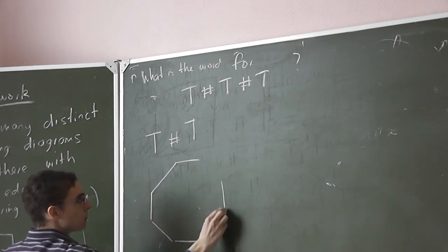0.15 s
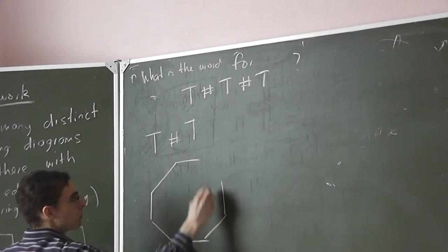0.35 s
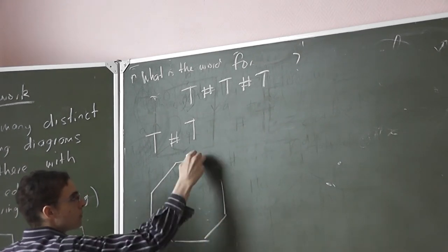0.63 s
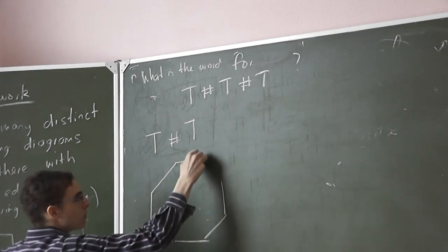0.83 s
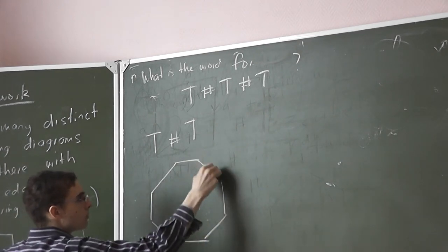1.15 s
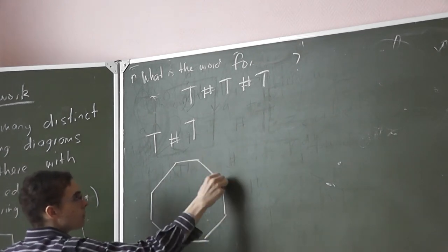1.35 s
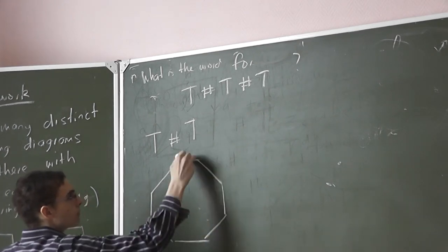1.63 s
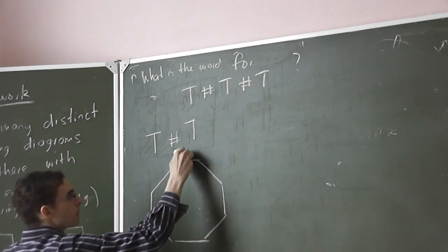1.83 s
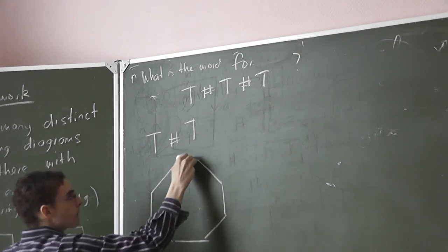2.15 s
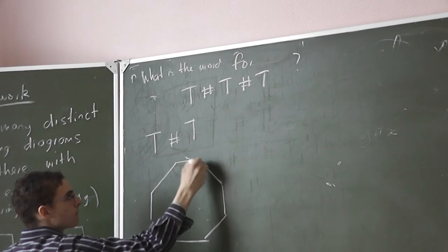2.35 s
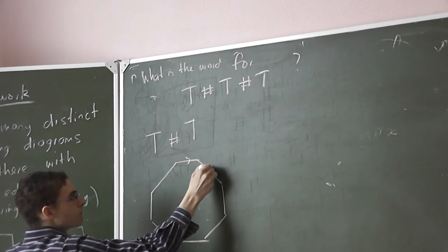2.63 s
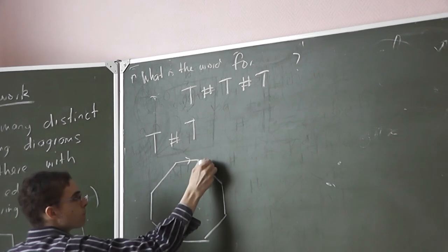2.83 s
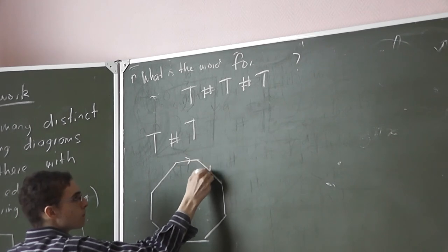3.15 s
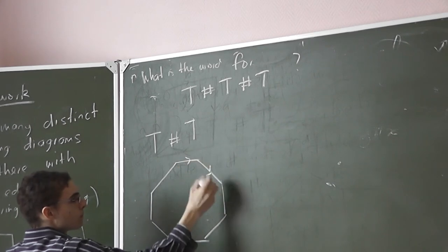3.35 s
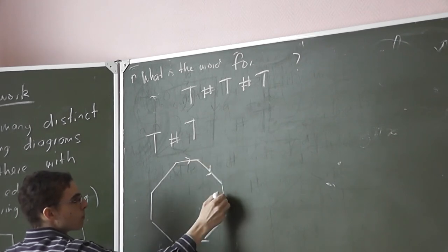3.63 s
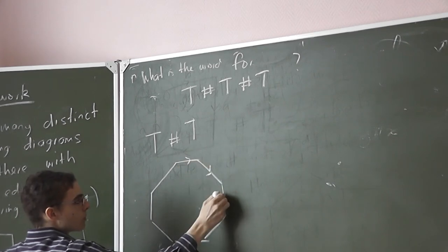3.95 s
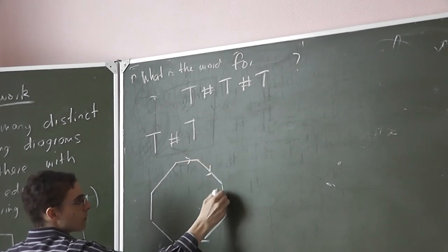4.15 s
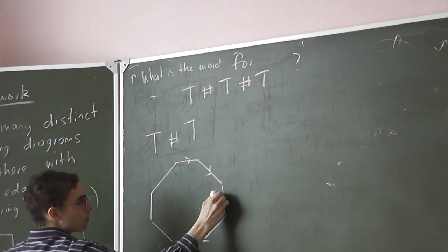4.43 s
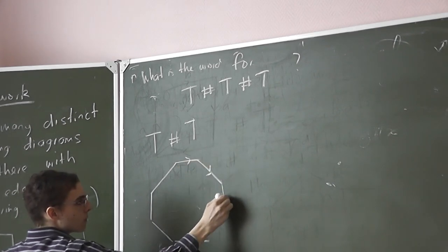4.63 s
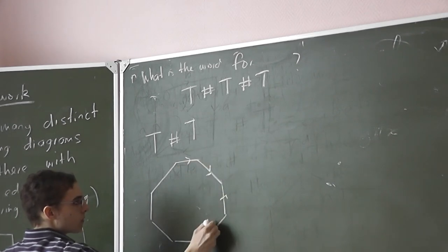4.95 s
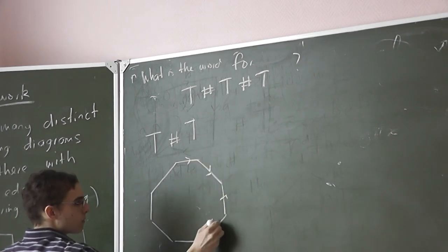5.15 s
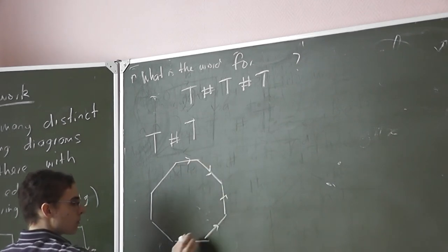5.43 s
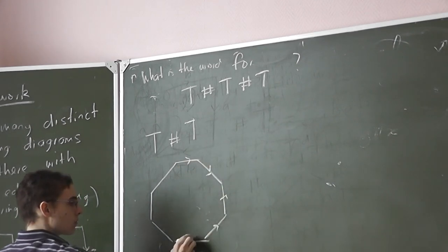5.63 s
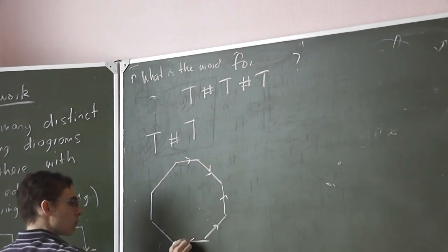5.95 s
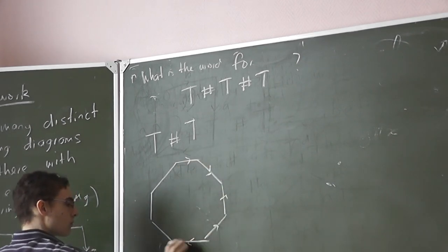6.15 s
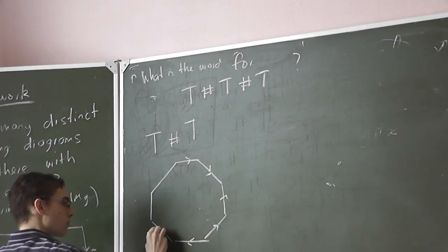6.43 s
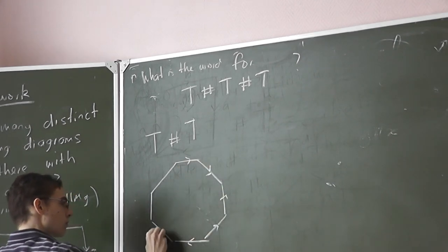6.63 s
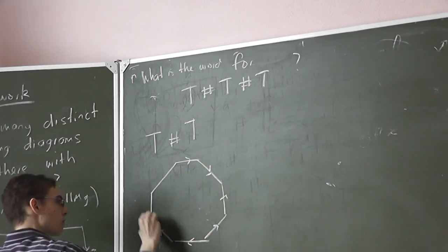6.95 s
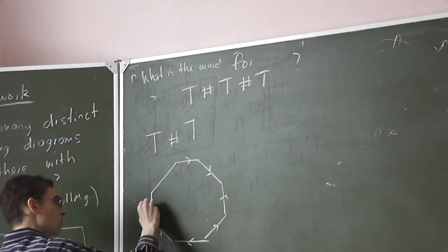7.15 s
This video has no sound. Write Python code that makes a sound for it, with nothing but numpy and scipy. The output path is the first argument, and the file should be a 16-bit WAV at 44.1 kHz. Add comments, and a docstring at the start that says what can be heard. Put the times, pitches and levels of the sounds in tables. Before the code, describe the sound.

A bare, hard-walled classroom with a steady soft hum of air and far machinery; chalk works on a large blackboard a few metres away. The tail of a knock opens it, with a dry scrape of a third of a second from 0.1 and a faint rub at 0.6. A sharp hollow knock at 0.85 leads into a longer, growing scrape to 1.6, with a dull low bump at 1.4. A crisp knock at 1.95 brings two short rubs; another at 2.75 is followed by quick gritty strokes until 3.45. At 3.9 a sleeve swishes softly with a knock. From 4.3 to 4.9, a hard tap and dense scribbling carry thin, faint squeaks, clearest near 4.7. Knocks at 5.15, 5.9 and 6.6 each have brief, quieter rubs after them. Faint scraping ends near 7.05, then a tiny tick at 7.25. Each knock rings woodily for about half a second.

```python
"""Chalk knocks on a large wall blackboard in a bare classroom, then rubs short lines, heard a few metres away.
Each landing is a short push that drums the modes of the board, with a faint tick as the tip chips.
Rubbing breaks off random crumbs of dust, which ring the stick and the board; some strokes squeak.
A sleeve brushes past once, as soft noise that swells and fades. The room rings for about half a second
over a steady hum of air and far machinery, made from shaped noise."""
import sys
import numpy as np
from scipy import signal
from scipy.fft import rfft, irfft, next_fast_len
from scipy.io import wavfile
from scipy.ndimage import uniform_filter1d, map_coordinates

SR = 44100
rng = np.random.default_rng(int(sys.argv[2]) if len(sys.argv) > 2 else 0)


def master(y):
    """Save y as 16-bit WAV."""
    cut = np.clip(np.atleast_2d(y).T, -1, 1)
    pcm = np.round(cut * 32767)  # scale
    wavfile.write(sys.argv[1], SR, pcm.astype(np.int16))


N = 321489  # length in samples

# Landings of the stick: start_s, push_db, contact_ms, drum_db (low boom of the spot that is hit)
LANDINGS = [(-.06, 13, 0.79, 0), (.854, 18.5, .5, -5.5), (1.439, -5, 5.2, 22.5), (1.951, 19, 0.65, -7),
            (2.75, 16, .44, -5), (3.351, -1.5, 0.8, -19), (3.886, -24, .31, 7), (3.905, 13, 0.71, -4),
            (4.278, -26.5, 0.2, -10), (4.365, 16, 0.47, -6.5), (4.59, -8.5, 0.2, -5),
            (5.144, 18, 0.717, -5.5), (5.916, 9.5, 0.67, 2), (6.62, 11.5, 0.67, -2)]
# Rubbed lines: start_s, length_s, hiss_db, swell_db (start to end),
# then, against the hiss: body_db (board), ring_db (stick)
STROKES = [(0.083, 0.33, -49, 1, -4, -3.5), (0.585, 0.088, -64, -11, -7, -12),
           (0.955, 0.61, -53.5, 9.5, 2.5, -3), (2.114, 0.15, -56, -5, 4, 1),
           (2.295, 0.099, -55.5, 7.5, 9, 3.5), (2.937, .12, -57.5, 7, 6.5, 4),
           (3.121, 0.15, -58, -7, 7, 5.5), (3.259, 0.19, -54, -12, 2.5, -1.2),
           (4.063, 0.13, -64.5, -6, -11, 7.5), (4.413, 0.15, -50.5, 5, 8.5, -10),
           (4.579, .13, -49, -19, 3.5, -16), (4.674, 0.061, -55.5, 6, 8, -9),
           (4.745, 0.1, -56.5, -8, 7.5, -1), (5.108, 0.039, -59, -2, 2, -7), (5.182, .18, -59, -6, 5.5, -4),
           (5.37, .11, -57, 7, 6.5, 2.5), (5.964, .15, -58.5, 4, 4.5, 3.5), (6.114, 0.15, -63, 6, 12, 8),
           (6.661, 0.086, -63, -.6, 6, 11), (6.787, 0.12, -60, -6.5, 6.5, 2.5),
           (6.957, 0.098, -65, -7, 11.5, 10)]
# Notes of the tip sticking and slipping: start_s, length_s, pitch_hz, level_db
SQUEAKS = [(4.51, .08, 7750, -69), (4.6, .14, 7750, -70), (4.7, .045, 2930, -54), (4.76, .03, 2930, -64),
           (4.82, .17, 2935, -74)]
# Modes of the board: pitch_hz, width_hz, level_db
BOARD_MODES = [(228.5, 31, 9.5), (291.2, 20.7, 13), (376.4, 19, 6.5), (543, 22, 9), (582, 11, 2.5),
               (703.5, 13.5, 6), (829, 8.8, 9.5), (898.4, 9.2, 3), (1030, 47, 5.5), (1270, 9.8, -18),
               (1357, 9, 3), (1740, 8.8, -26), (1820, 56, -3.5), (2017, 43, 4)]
# Lengthwise modes of the chalk: pitch_hz, width_hz, level_db
STICK_MODES = [(5530, 720, 5), (11920, 540, 6)]
# Tone of the knock on the board: frequency_hz, gain_db
KNOCK_TONE = [(60, -30), (150, -35), (195, -15.5), (225, -7.5), (500, -6.5), (900, 0), (1500, -0.5),
              (2400, -2), (3200, -2.5), (4500, -5), (9000, -24), (16000, -28)]
# Tone of a chipping tip: frequency_hz, gain_db
TICK_TONE = [(1500, -20), (3000, 0.5), (5000, 5), (8000, -9), (16000, -24)]
# Tone of the breaking dust: frequency_hz, gain_db
DUST_TONE = [(1500, -44), (2500, 0.5), (4200, -3), (7000, -7.5), (10500, -16), (13000, -21.5), (14500, -27),
             (15700, -44)]
# Tone of the board's body under a stroke: frequency_hz, gain_db
BODY_TONE = [(120, -72), (300, -7), (500, -7.5), (900, -2.5), (1600, 0), (2400, -7), (3500, -31),
             (6000, -70)]
# Tone of the room's steady noise: frequency_hz, level_db_per_hz
AIR_TONE = [(15, -41), (25, -37), (43, -5.5), (75, -8), (156, -6), (183, -13), (210, -4), (275, -7),
            (423, -11), (898, -14), (1380, -19), (1580, -19.5), (2710, -31), (4280, -29), (15600, -43.5)]
# Narrow swells in the air noise: pitch_hz, width_hz, level_db
HUM_MODES = [(119, 5.1, 6), (163.7, 15.5, 9), (872, 154, 4.5), (4310, 270, -2.5)]
# Left-right likeness of the air noise: frequency_hz, likeness (1 = same on both sides)
AIR_ALIKE = [(60, 0.42), (180, -0.0), (550, 0.082), (1650, 0.74), (4970, 1), (15000, 0.39)]
# Left-right likeness of the room's tail: frequency_hz, likeness (1 = same on both sides)
ROOM_ALIKE = [(60, 0.13), (180, 0.99), (550, 0.56), (1650, 0.16), (4970, 1), (15000, 0.29)]
# Time the room takes to fade by 60 dB: frequency_hz, fade_s
ROOM_FADE = [(150, 0.67), (400, 0.56), (1000, 0.53), (2800, 0.38), (7000, 0.32), (14000, 0.38)]
# Left side over right side: frequency_hz, difference_db
LEAN = [(100, -1.5), (300, -.5), (900, -0.7), (3000, 0), (10000, 0)]
# Tone of the brushing cloth: frequency_hz, level_db_per_hz
CLOTH_TONE = [(1470, -24), (2500, -8), (2950, -14), (3860, -5), (6130, -3.5), (7080, -7), (7800, -8),
              (10800, -25), (13000, -26)]
# Chips of the tip with no landing: start_s, level_db
LONE_CHIPS = [(2.092, -50), (7.257, -39)]

AIR_DB = -53.5
TOP_HZ = 15740  # the highest treble, from here up, is left out
UPPER_DB = -0.5  # the board around 1.7 kHz, under every landing
CHIP_DB, CHIP_DELAY_S = -37, .004  # the tip chips as the stick rocks: against the push, after the landing
# The drum follows the body, and is stronger in a long stroke
DRUM_DB, DRUM_PER_BODY, DRUM_DB_PER_S = -15.5, 0.94, 18.5
TOP_DB, TOP_PER_RING = 0.8, 0.43  # the top octave follows the ring of the stick
# The tip creeps after a landing: length, hiss against the push, then body and ring against the hiss
SETTLE_S, SETTLE_DB, SETTLE_BODY_DB, SETTLE_RING_DB = 0.2, -79, 6.5, -12
# The sleeve brushing past: loudest moment, its level, its end; then the rise and fall slopes
BRUSH_S, BRUSH_TOP_DB, BRUSH_END_S = 3.888, -55.5, 4.1
BRUSH_RISE_DB_PER_S, BRUSH_FALL_DB_PER_S = 84, 57
WALL_S, WALL_DB, WALL_HZ = .016, -4.5, 1500  # the facing wall's dulled echo: delay, level, treble limit


def amp(db):
    """Turn decibels into a plain multiplier."""
    return 10 ** (np.asarray(db) / 20)


def unit(x):
    """Scale a sound to an average (RMS) level of one."""
    return x / np.sqrt(np.mean(x ** 2) + 1e-20)


def along(points, hz):
    """Read a curve of (Hz, value) points on a log frequency axis."""
    f, value = np.transpose(points)
    return np.interp(np.log(hz + 1), np.log(f + 1), value)


def wobble(rate):
    """A smooth random curve through this many random points a second."""
    knots = rng.standard_normal(int(N * rate / SR) + 4)
    return map_coordinates(knots, [np.arange(N) * rate / SR])


def filtered(x, response):
    """Shape a sound by multiplying its spectrum with a response."""
    m = next_fast_len(x.shape[-1] + SR // 4)
    spectrum = rfft(x, m) * response(np.fft.rfftfreq(m, 1 / SR))
    return irfft(spectrum, m)[..., :x.shape[-1]]


def causal(gain):
    """Give a gain curve the phase that makes its sound start no earlier than its cause."""
    cepstrum = irfft(np.log(gain + 1e-6))
    # fold the part before time zero onto the part after it
    cepstrum[1:len(cepstrum) // 2] *= 2
    cepstrum[len(cepstrum) // 2 + 1:] = 0
    return np.exp(rfft(cepstrum))


def resonances(modes, f, scatter_db=0):
    """Add up damped modes, each at a newly drawn strength if scattered."""
    total = 0
    for pitch, width, db in modes:
        strength = amp(db + scatter_db * rng.normal())
        total = total + strength * 1j * f * width / (pitch * pitch - f * f + 1j * f * width)
    return total


def patchy(x, depth_db, size):
    """Make a sound uneven, with slow random patches of gain in time and frequency."""
    z = signal.stft(x, nperseg=512)[2]
    field = uniform_filter1d(rng.standard_normal(z.shape[-2:]), size=6, axis=0)
    field = uniform_filter1d(field, size=size, axis=1)
    return signal.istft(z * amp(depth_db * unit(field)), nperseg=512)[1][..., :N]


def spread(pair, alike):
    """Mix two unrelated sounds into a left and right of the given likeness."""
    turn = lambda hz: np.arccos(np.clip(along(alike, hz), -1, 1)) / 2
    mid, side = filtered(pair, lambda hz: np.array([np.cos(turn(hz)), np.sin(turn(hz))]))
    return np.array([mid + side, mid - side])


def room(x, near_db, near_s):
    """A dense near burst from the panel and its wall, once more off the facing wall, then the room's tail."""
    hz, t, z = signal.stft(rng.standard_normal((2, SR)), SR, nperseg=256)
    fade = amp(-60 * t / along(ROOM_FADE, hz)[:, None])
    tail = signal.istft(z * fade, SR, nperseg=256)[1][:, :SR]
    t = np.arange(SR) / SR
    near = amp(near_db - 60 * t / near_s) * rng.standard_normal(SR)
    delay_and_dull = lambda f: np.exp(-2j * np.pi * f * WALL_S) / (1 + 1j * f / WALL_HZ) ** 2
    near = near + amp(WALL_DB) * filtered(near, delay_and_dull)
    # the tail builds up more slowly than the near burst
    answer = spread(tail, ROOM_ALIKE) * (1 - np.exp(-t / 0.0044)) + near
    answer = answer * (1 - np.exp(-t / 0.0015))
    return signal.fftconvolve(x[None], answer / np.sqrt(SR / 25), axes=1)


def place(out, start_s, sound):
    """Add a sound at its start; one spare second ahead leaves space for starts before zero."""
    out[:, SR + round(start_s * SR):][:, :sound.shape[1]] += sound


def landings():
    """The push is half a sine, so a longer contact is duller; the spot hit sets how much the board drums."""
    out = np.zeros((2, N + 3 * SR))
    blow = np.eye(1, SR // 4)[0]  # a single click
    for start, push_db, contact_ms, drum_db in LANDINGS:
        cycles = lambda f: f * contact_ms / 1000
        push_size = lambda f: np.sinc(cycles(f) - .5) + np.sinc(cycles(f) + .5)
        push = lambda f: push_size(f) * np.exp(-1j * np.pi * cycles(f))
        upper_db = lambda f: UPPER_DB * np.exp(-((f - 1700) / 550) ** 2)
        spot_db = lambda f: drum_db / (1 + (f / 420) ** 4) + upper_db(f)
        tone = lambda f: causal(amp(along(KNOCK_TONE, f) + spot_db(f)))
        panel = lambda f: tone(f) * (1.5 + resonances(BOARD_MODES, f, scatter_db=0.5))
        knock = filtered(blow, lambda f: push(f) * panel(f))
        place(out, start, amp(push_db) * room(knock, near_db=8.0, near_s=0.063))
    return out[:, SR:SR + N]


def chips():
    """The tip chips with a tiny bright tick, soon after each landing and now and then alone."""
    out = np.zeros((2, N + 3 * SR))
    blow = np.eye(1, SR // 4)[0]
    tick = filtered(blow, lambda f: causal(amp(along(TICK_TONE, f))))
    after_landings = [(start + CHIP_DELAY_S, push_db + CHIP_DB) for start, push_db, *_ in LANDINGS]
    for start, db in LONE_CHIPS + after_landings:
        place(out, start, amp(db) * room(tick, near_db=23.5, near_s=0.016))
    return out[:, SR:SR + N]


def air():
    """Steady noise of air and far machinery in faint patches, with a few narrow swells in frequency."""
    pair = patchy(rng.standard_normal((2, N)), depth_db=1.5, size=14)
    pair = filtered(pair, lambda f: amp(along(AIR_TONE, f)) * (1 + resonances(HUM_MODES, f)))
    drift_db = .5 * wobble(3)
    return amp(AIR_DB + drift_db) * unit(spread(pair, AIR_ALIKE))


def dust(rate, spread_db):
    """Crumbs of chalk break off at random, rate a second, a few larger than the rest."""
    breaks = rng.random(N) < rate / SR
    sizes = rng.standard_normal(N) * amp(spread_db * rng.exponential(size=N))
    return unit(breaks * sizes)


def stroke_drive():
    """The moving hand sets how hard hiss, body, drum, ring and top are driven, in that order."""
    t = np.arange(N) / SR
    power = np.zeros((5, N))
    creeps = [(start, SETTLE_S, push_db + SETTLE_DB, 0, SETTLE_BODY_DB, SETTLE_RING_DB)
              for start, push_db, *_ in LANDINGS]
    for start, length, db, swell_db, body_db, ring_db in STROKES + creeps:
        done = np.clip((t - start) / length, 0, 1)
        # the hand speeds up and slows down
        speed = np.abs(np.sin(np.pi * done)) ** 0.64 * amp(db + swell_db * (done - .5))
        drum_db = DRUM_DB + DRUM_PER_BODY * body_db + DRUM_DB_PER_S * length
        top_db = TOP_DB + TOP_PER_RING * ring_db
        power += speed ** 2 * amp([0, body_db, drum_db, ring_db, top_db])[:, None] ** 2
    return np.sqrt(power) * amp(0.78 * wobble(40))  # the tip catches and lets go


def strokes():
    """Breaking dust rings the stick and drives the board's body and its two lowest modes."""
    hiss_drive, body_drive, drum_drive, ring_drive, top_drive = stroke_drive()
    crumbs = patchy(dust(rate=8000, spread_db=1), depth_db=1.5, size=6)
    force = unit(filtered(crumbs, lambda f: amp(along(DUST_TONE, f))))
    below_top = lambda f: 1 / (1 + (f / 9000) ** 8)
    hiss = filtered(force, below_top)
    ring = filtered(force, lambda f: resonances(STICK_MODES[:1], f))
    top = filtered(force, lambda f: 0.82 * (1 - below_top(f)) + resonances(STICK_MODES[1:], f))
    high = hiss_drive * hiss + ring_drive * ring + top_drive * top

    crumbs = patchy(dust(rate=8000, spread_db=0.5), depth_db=1.0, size=10)
    panel = lambda f: amp(along(BODY_TONE, f)) * (2 + resonances(BOARD_MODES[2:], f))
    body = unit(filtered(crumbs, panel))
    # the two lowest modes are narrow bands of noise
    drum = sum(unit(filtered(rng.standard_normal(N), lambda f: resonances([mode], f) ** 2))
               for mode in BOARD_MODES[:2])
    low = body_drive * body + drum_drive * drum * amp(-2.5)
    low = low + squeaks()  # the squeaks share the low part's room sound

    high_room = room(high, near_db=-1.5, near_s=0.13)[:, :N]
    low_room = room(low, near_db=1, near_s=0.064)[:, :N]
    return amp(-6) * high + amp(-4.5) * high_room + amp(-4.0) * low + amp(-1.0) * low_room


def sleeve():
    """Cloth slides on cloth: soft patchy hiss that swells and fades."""
    t = np.arange(N) / SR
    rise_db, fall_db = BRUSH_RISE_DB_PER_S * (BRUSH_S - t), BRUSH_FALL_DB_PER_S * (t - BRUSH_S)
    level_db = BRUSH_TOP_DB - np.where(t < BRUSH_S, rise_db, fall_db)
    noise = patchy(rng.standard_normal(N), depth_db=3.5, size=8)
    hiss = unit(filtered(noise, lambda f: amp(along(CLOTH_TONE, f))))
    hiss = hiss * amp(level_db) * np.clip((BRUSH_END_S - t) / .03, 0, 1)
    return amp(-4) * hiss + amp(-4.5) * room(hiss, near_db=-4, near_s=.06)[:, :N]


def squeaks():
    """The tip sticks and slips in a steady rhythm: pure notes of slightly wavering level."""
    t = np.arange(N) / SR
    out = np.zeros(N)
    for start, length, hz, db in SQUEAKS:
        waver_db = 1.5 * wobble(40)
        swell = np.abs(np.sin(np.pi * np.clip((t - start) / length, 0, 1))) ** .5
        out += amp(db + waver_db) * swell * np.sin(2 * np.pi * hz * t)
    return out


def scene():
    """All the sounds together; the squeaks are inside the strokes."""
    return landings() + chips() + air() + strokes() + sleeve()


def record(dry):
    """Left and right differ a little; the deepest bass and the highest treble are left out."""
    def left_and_right(hz):
        lean = amp(along(LEAN, hz) * np.array([[.5], [-.5]]))
        bass_loss = hz ** 2 / (hz ** 2 + 36 ** 2)
        treble_loss = 1 / np.sqrt(1 + (hz / 14800) ** 16)
        return lean * bass_loss * treble_loss * (hz < TOP_HZ)
    return filtered(dry, left_and_right)


dry = scene()
out = record(dry)
master(out)
```